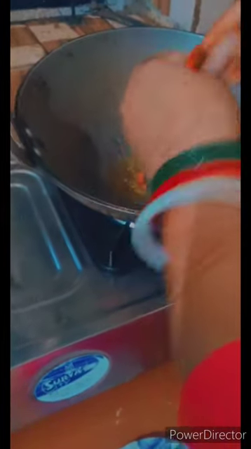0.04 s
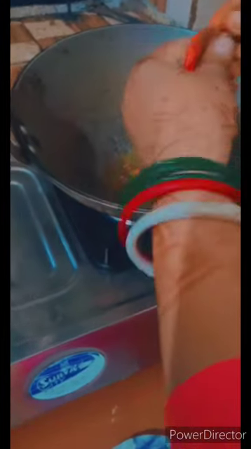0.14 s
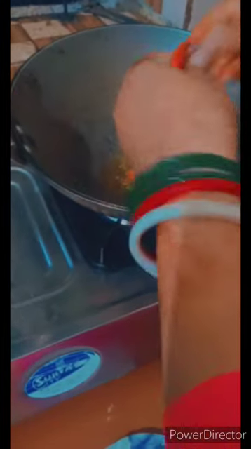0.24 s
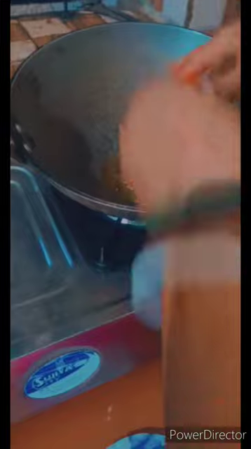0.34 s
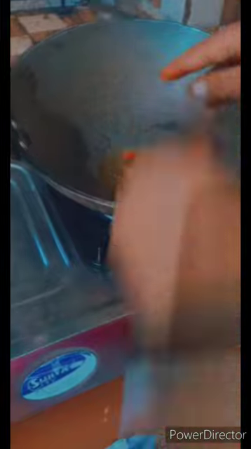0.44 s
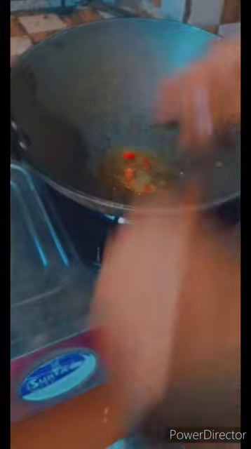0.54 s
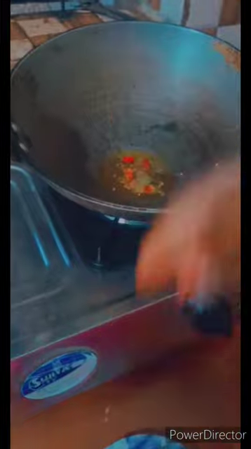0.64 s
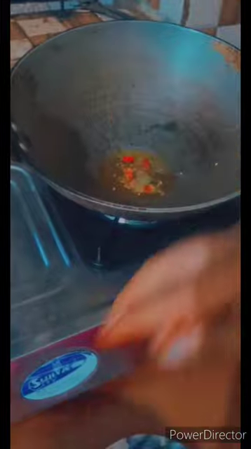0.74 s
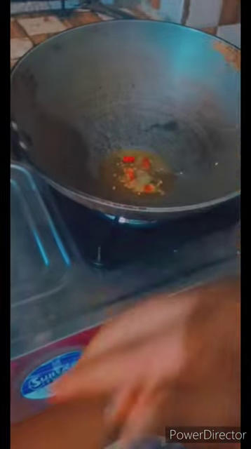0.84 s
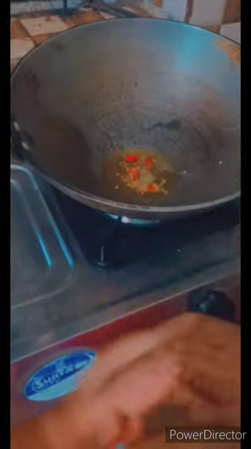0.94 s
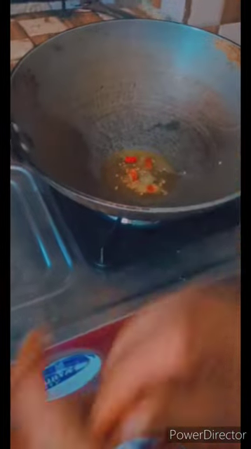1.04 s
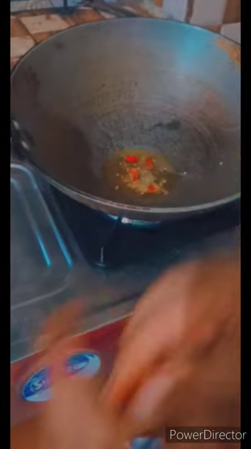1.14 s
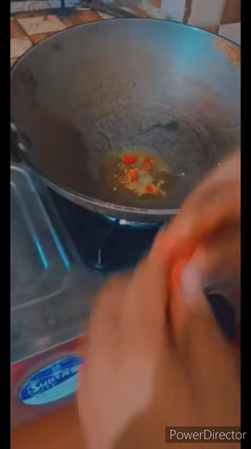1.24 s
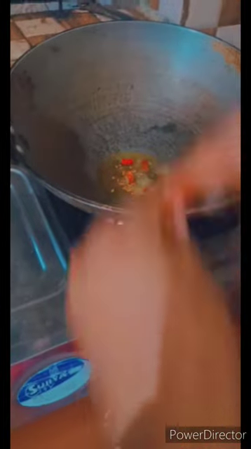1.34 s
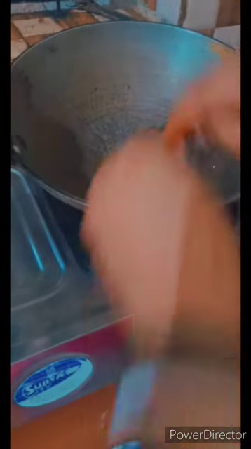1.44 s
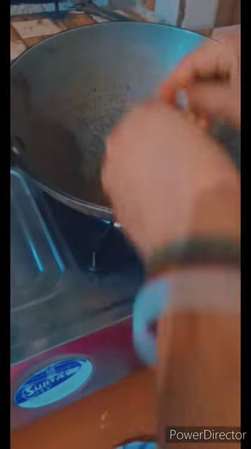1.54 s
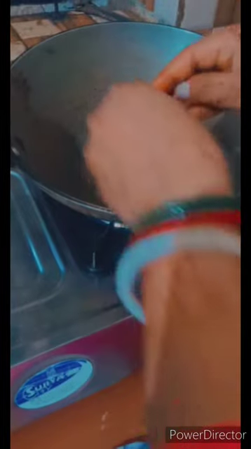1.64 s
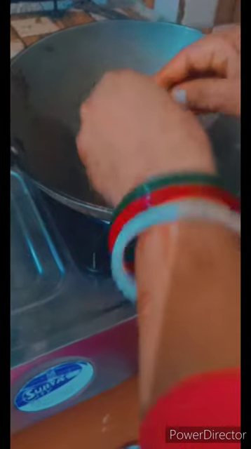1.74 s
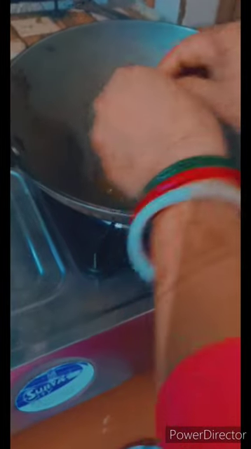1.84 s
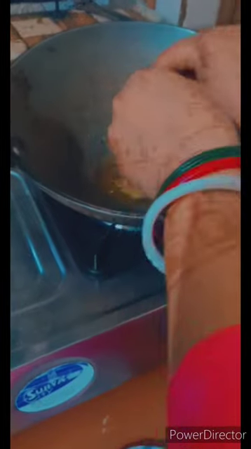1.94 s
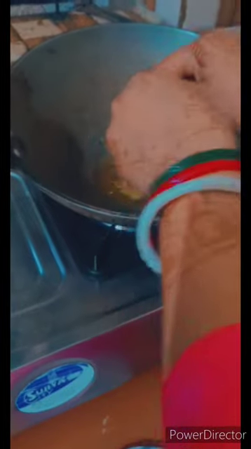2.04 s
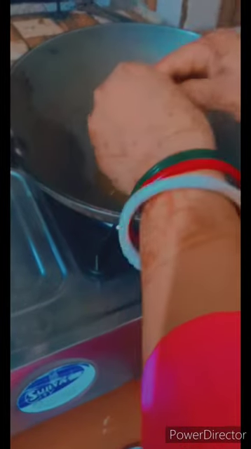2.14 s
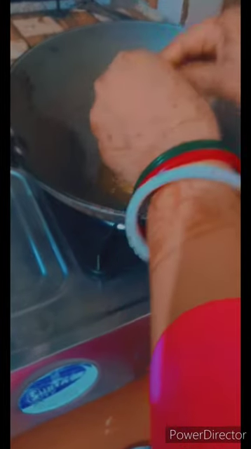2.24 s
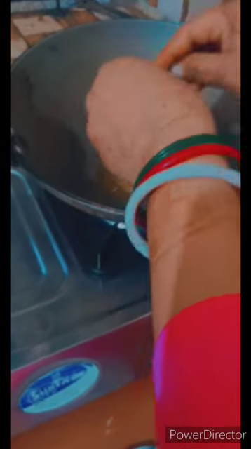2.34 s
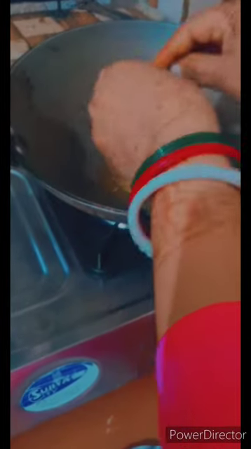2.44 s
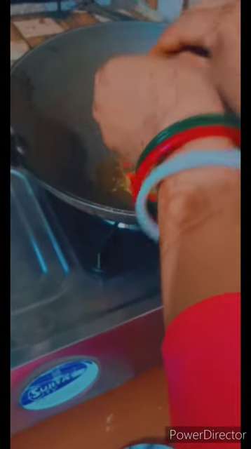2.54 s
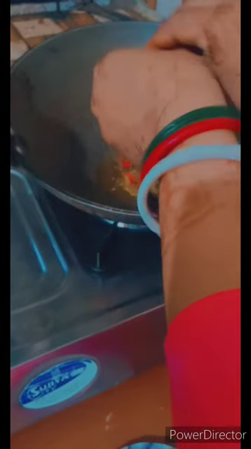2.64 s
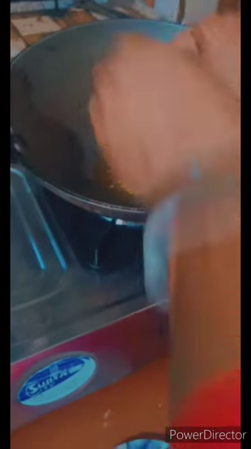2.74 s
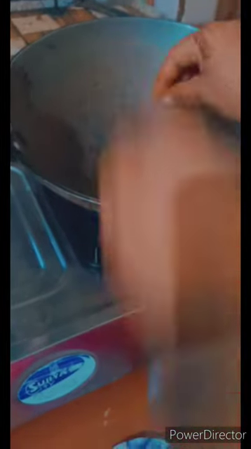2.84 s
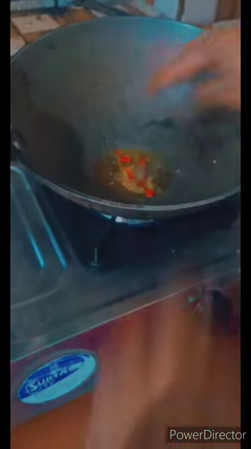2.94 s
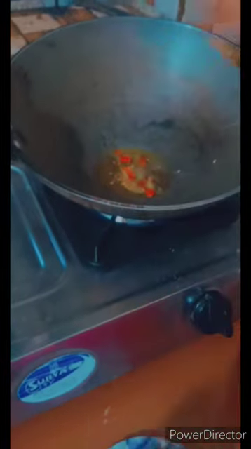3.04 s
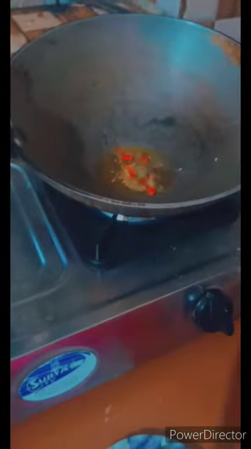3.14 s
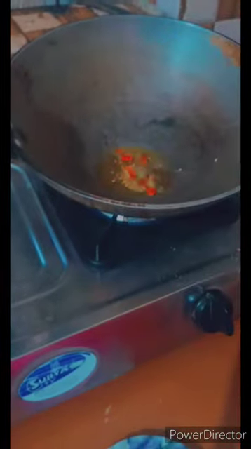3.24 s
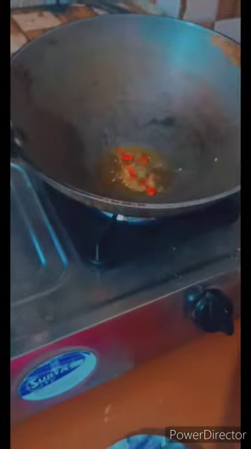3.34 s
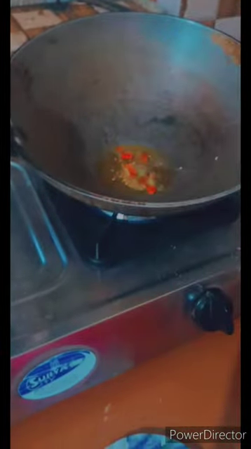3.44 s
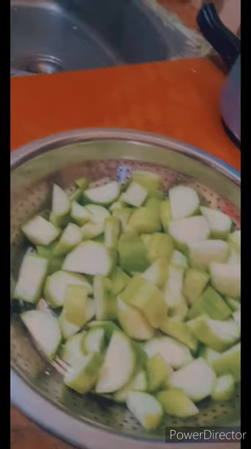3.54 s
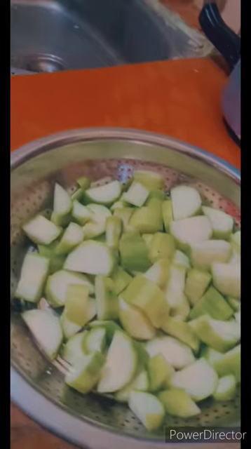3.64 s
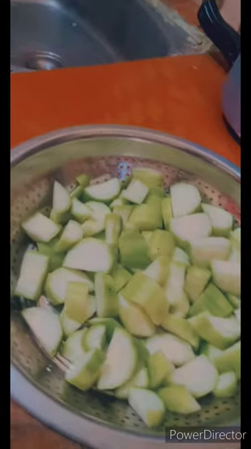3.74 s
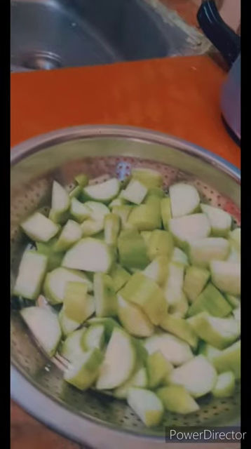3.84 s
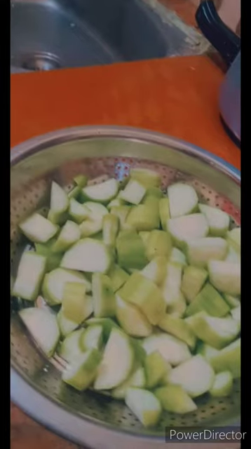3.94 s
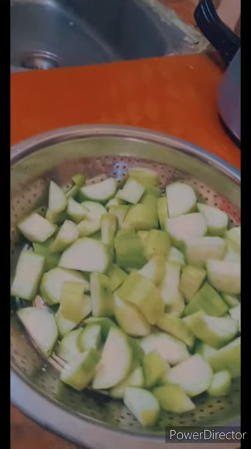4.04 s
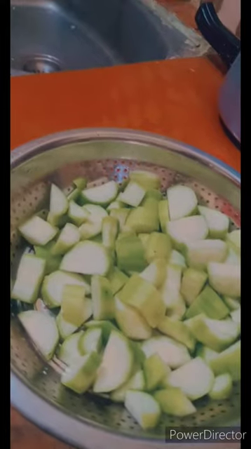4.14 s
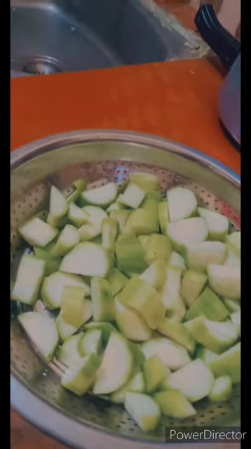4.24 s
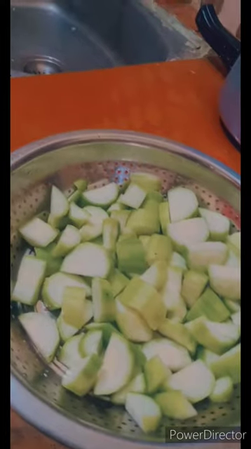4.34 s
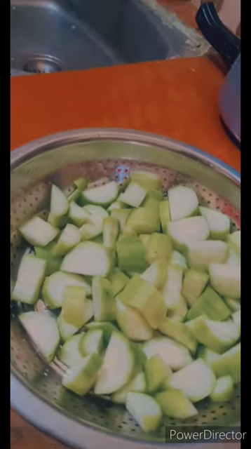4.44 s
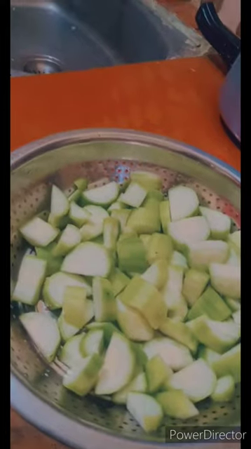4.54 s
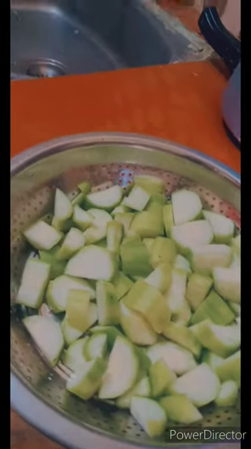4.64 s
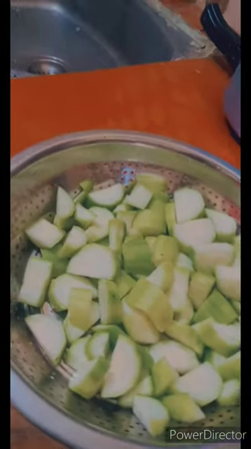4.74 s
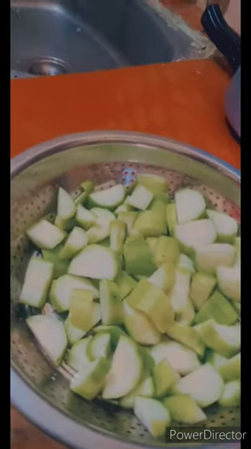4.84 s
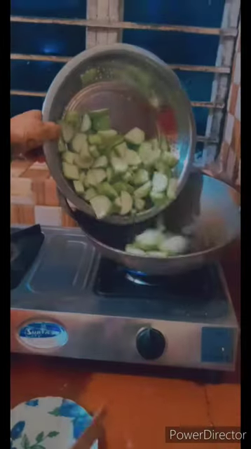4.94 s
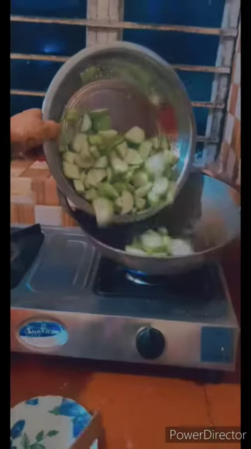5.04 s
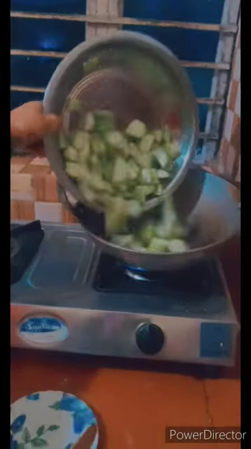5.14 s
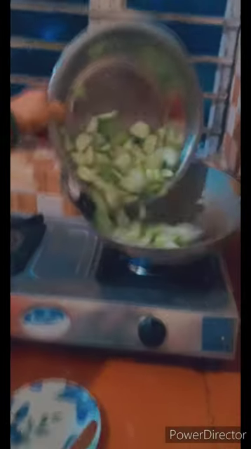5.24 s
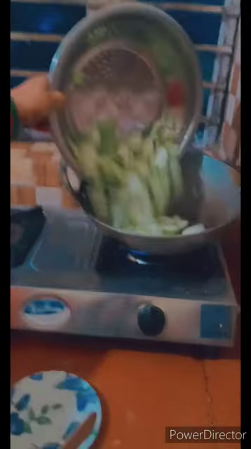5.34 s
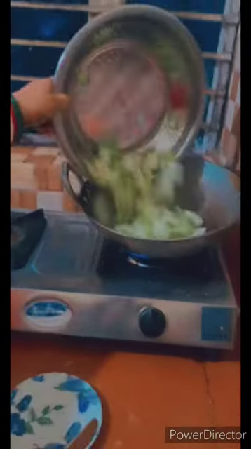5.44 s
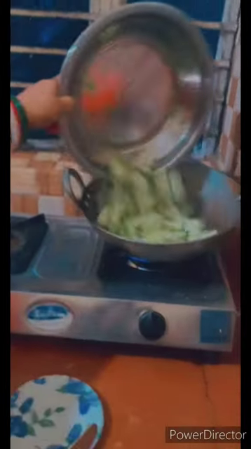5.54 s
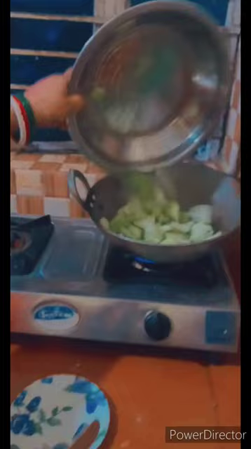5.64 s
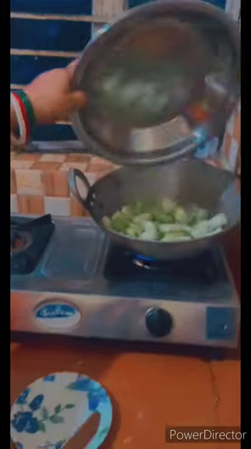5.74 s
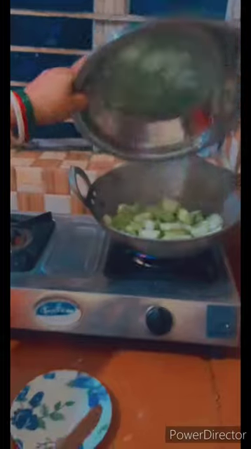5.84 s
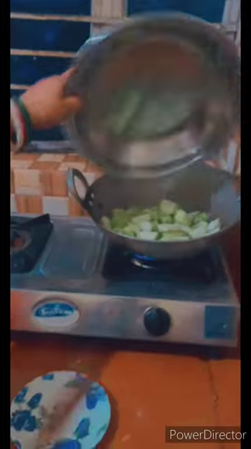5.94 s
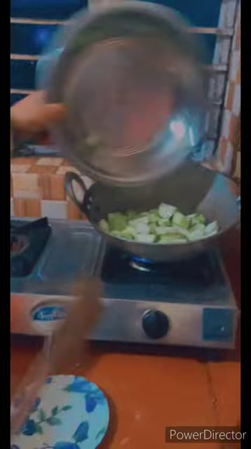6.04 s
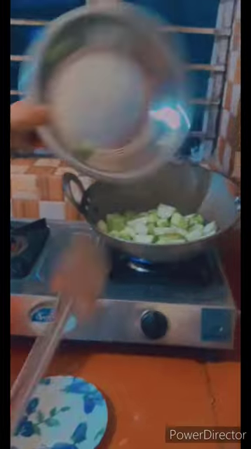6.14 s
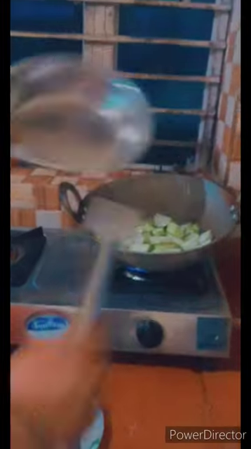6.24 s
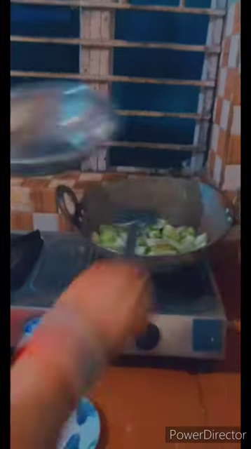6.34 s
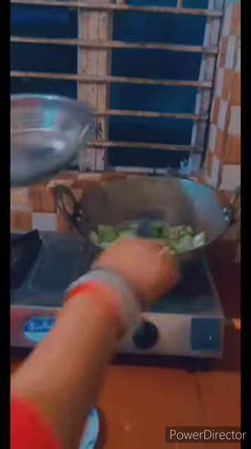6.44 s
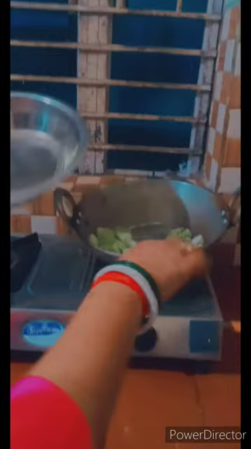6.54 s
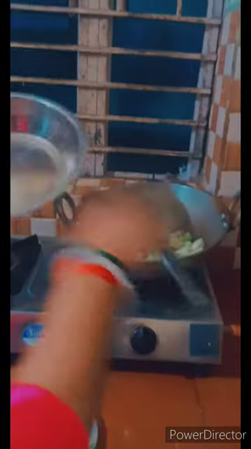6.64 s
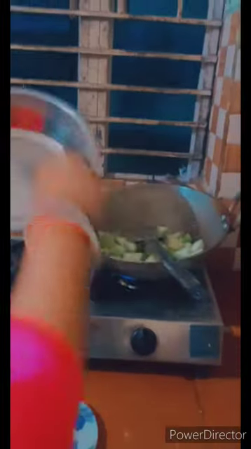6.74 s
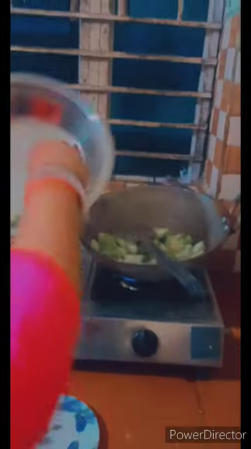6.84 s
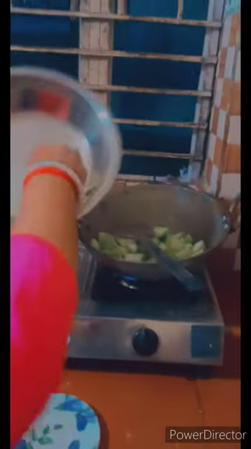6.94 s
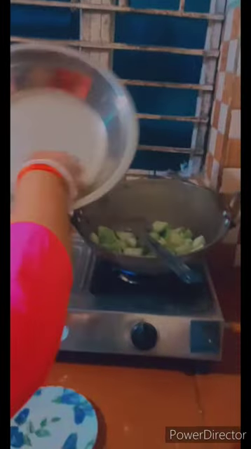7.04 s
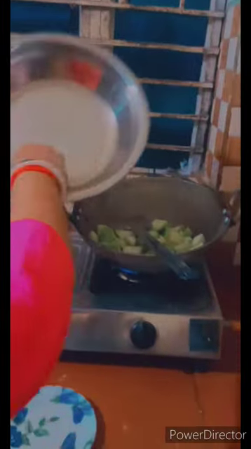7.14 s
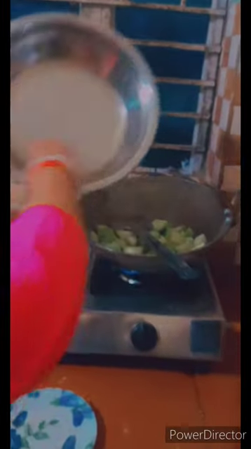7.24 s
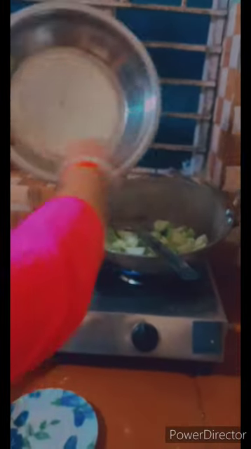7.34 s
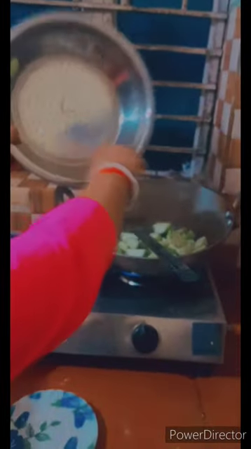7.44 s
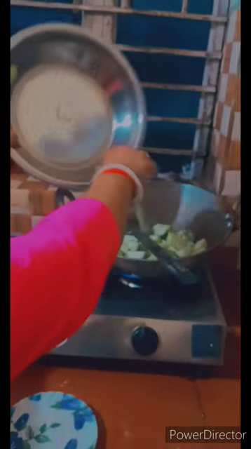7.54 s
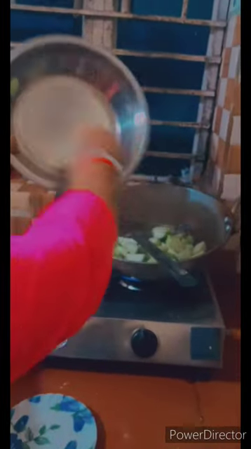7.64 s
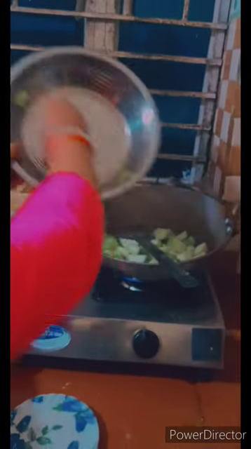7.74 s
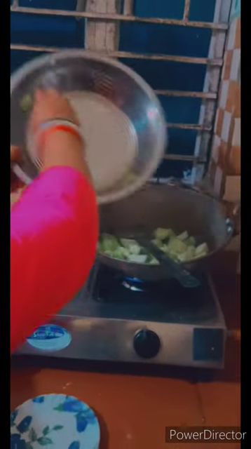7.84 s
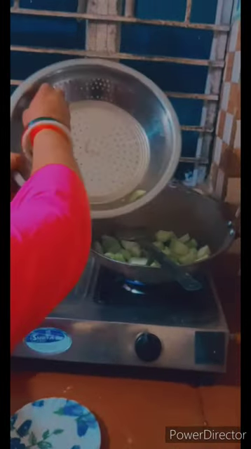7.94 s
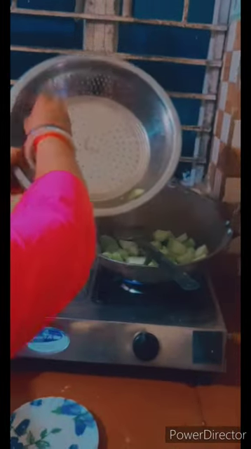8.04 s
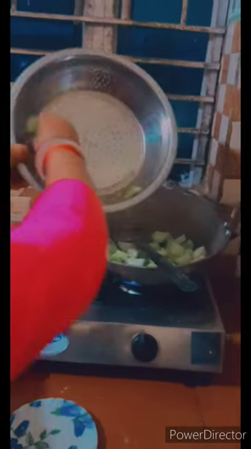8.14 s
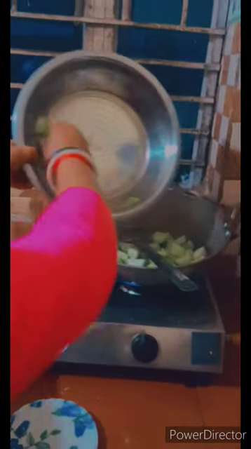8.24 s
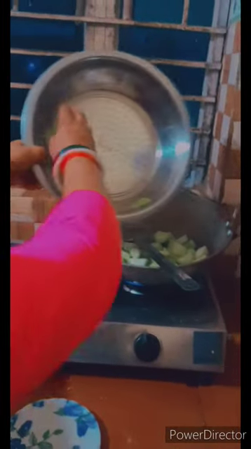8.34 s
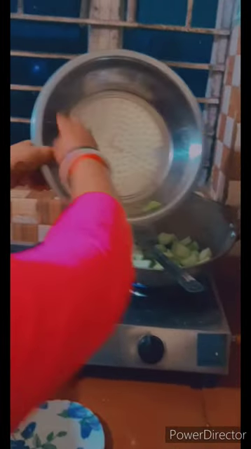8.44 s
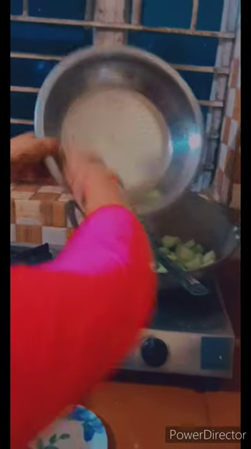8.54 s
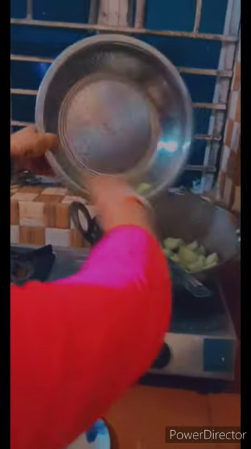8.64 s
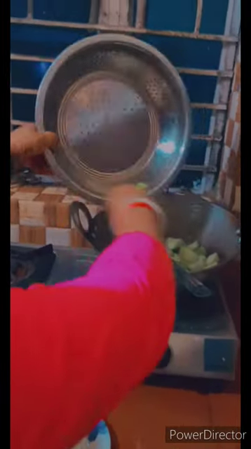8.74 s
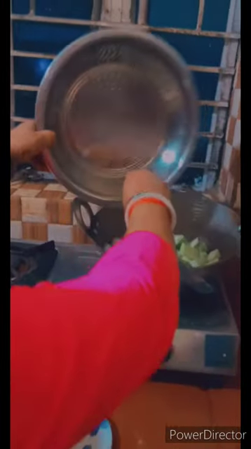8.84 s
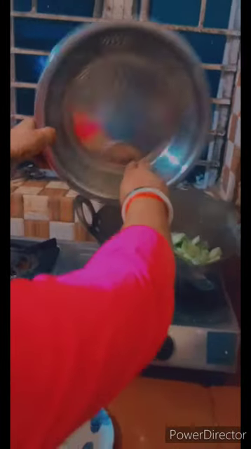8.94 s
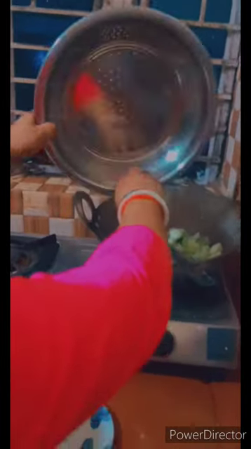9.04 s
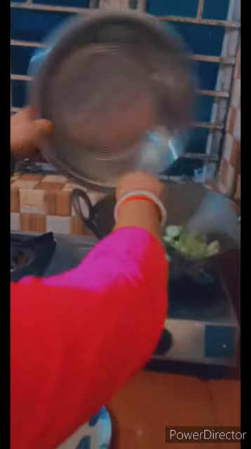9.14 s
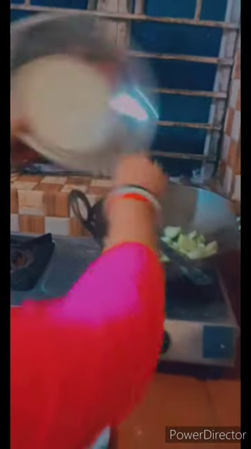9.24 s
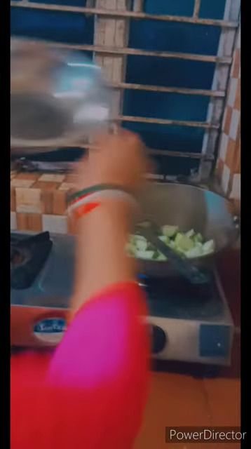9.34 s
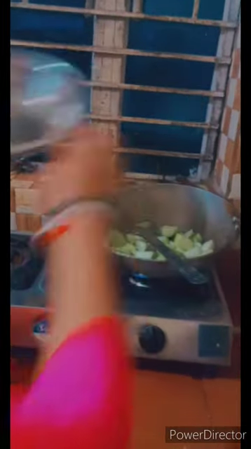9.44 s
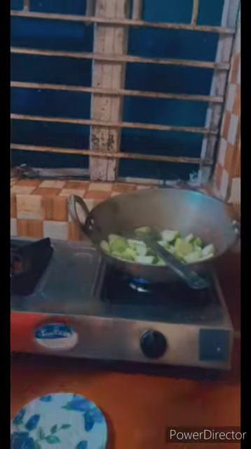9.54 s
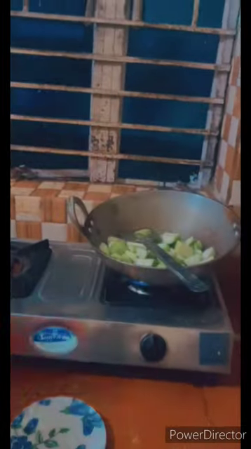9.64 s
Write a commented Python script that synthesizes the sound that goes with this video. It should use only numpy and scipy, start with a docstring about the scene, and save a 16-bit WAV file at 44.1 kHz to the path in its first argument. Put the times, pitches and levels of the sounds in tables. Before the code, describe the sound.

Soft hum and small metallic clicks, brief silences, then a sudden loud roar of frying in a wok, with a metal spoon dropping in and scraping.

```python
"""A tiled home kitchen at one close microphone, in three shots with silence between them.
A fan hums as beating tones; a gas flame hisses steadily over rumbling air, both finely patchy noise.
Bangles click and utensils tap, as short cracks followed by dying noise, and a gas knob snaps over.
Chopped gourd tumbles into a steel wok and fries loudly: dense noise bursts coloured by the bowl.
A metal spoon drops into the wok, bounces and scrapes: ringing modes with short rasps."""
import sys
import numpy as np
from scipy import signal
from scipy.fft import rfft, irfft
from scipy.io import wavfile
from scipy.ndimage import uniform_filter1d

SR = 44100
rng = np.random.default_rng(int(sys.argv[2]) if len(sys.argv) > 2 else 0)


def materialize(psi):
    """Save the field psi as 16-bit PCM at rate SR to the path in sys.argv[1].

    A 1-D psi becomes a single channel; in a 2-D psi each row is a channel.
    """
    bounded = np.clip(np.atleast_2d(psi).T, -1, 1)
    quanta = np.round(bounded * 32767).astype(np.int16)
    wavfile.write(sys.argv[1], SR, quanta)


N = 427329
TIME = np.arange(N) / SR
FREQS = np.fft.rfftfreq(N, 1 / SR)
SHEEN_HZ = 14200  # above this the very top of the frying and the clicks stands out
HEAP_S = 5.076  # the heap of gourd slides into the oil

# Spectrum of the sizzle. Each row: frequency in Hz, relative level in dB.
SIZZLE = [(60, -41), (230, -15.5), (350, -25), (500, -14), (800, -5.5), (1400, -2), (2200, 2.5), (3000, 0),
          (4500, 2.5), (5700, 0.5), (6600, -5), (7300, -18.5), (8100, -27), (11000, -21.5), (13900, -21)]
# The bowl of the wok colours the frying. Each row: frequency in Hz, width in Hz, gain in dB.
WOK_RESONANCES = [(525, 28, 4), (593, 18, -12), (786, 9.8, 4.5), (966, 175, -4), (1090, 18, 6.5),
                  (1380, 28, 0), (1408, 46, 5), (1720, 42, 3), (2262, 65, 4), (3380, 60, 0.5)]
BUBBLES_PER_S, BUBBLE_SPREAD_DB = 15000, 1.5
SHEEN_WIDTH_HZ, SHEEN_DB = 100, 11
# a few pieces reach the oil ahead of the heap
FIRST_PIECES_S, FIRST_PIECES_DB, FIRST_RISE_S = 4.995, -12.5, 0.036
HEAP_RISE_S = 0.013
FRY_DB, FRY_SWAY_DB = -23.5, .3  # steady sizzle and its slow unrest
FLASH_DB, FLASH_PEAK_S, FLASH_WIDTH_S = 1.55, 5.45, 0.25  # surface water flashes to steam
# bubbling deepens as juice seeps out; levels are relative to the sizzle
BODY_WET_DB, BODY_SETTLED_DB, BODY_SWAY_DB = -14.5, -9.5, 0.57
JUICE_S, JUICE_SPREAD_S = 6.25, 0.41
# fine spray thins as the oil cools; levels are relative to the sizzle
SPRAY_FRESH_DB, SPRAY_SETTLED_DB, SPRAY_SWAY_DB, SPRAY_FADE_S = -10, -13, 0.8, 2.15


def frying():
    """Thousands of steam bubbles burst each second; the bowl of the wok colours them."""
    flash_db = FLASH_DB * np.exp(-((TIME - FLASH_PEAK_S) / FLASH_WIDTH_S) ** 2)
    level_db = FRY_DB + flash_db + FRY_SWAY_DB * sway(per_s=5.5)
    juice = (1 + np.tanh((TIME - JUICE_S) / JUICE_SPREAD_S)) / 2
    fresh = np.exp(-np.maximum(TIME - HEAP_S, 0) / SPRAY_FADE_S)
    body_db = BODY_WET_DB + (BODY_SETTLED_DB - BODY_WET_DB) * juice
    body_db = body_db + BODY_SWAY_DB * sway(per_s=4.9)
    spray_db = SPRAY_SETTLED_DB + (SPRAY_FRESH_DB - SPRAY_SETTLED_DB) * fresh
    spray_db = spray_db + SPRAY_SWAY_DB * sway(per_s=3.5)

    bubbles = room(pops(BUBBLES_PER_S, BUBBLE_SPREAD_DB), wet_db=-3.5)
    bursts = rfft(bubbles + 0.97 * rng.standard_normal(N))
    sheen = (1 + np.tanh((FREQS - SHEEN_HZ) / SHEEN_WIDTH_HZ / 2)) / 2
    colour = amp(read(SIZZLE, FREQS) + SHEEN_DB * sheen)
    for hz, width, db in WOK_RESONANCES:
        colour = colour * amp(db / (1 + (2 * (FREQS - hz) / width) ** 2))

    low, high = 1 - above(FREQS, 2390), above(FREQS, 7100, order=24)
    body = band(bursts, colour * low, 500, 1800)
    hiss = band(bursts, colour * (1 - low - high), 2000, 7000)
    spray = band(bursts, colour * high, 9000, 15500)
    first_pieces = amp(FIRST_PIECES_DB) * rise(FIRST_PIECES_S, FIRST_RISE_S)
    in_oil = np.maximum(first_pieces, rise(HEAP_S, HEAP_RISE_S))
    return in_oil * amp(level_db) * (hiss + amp(body_db) * body + amp(spray_db) * spray)


# Ringing of the steel wok. Each row: frequency in Hz, relative level in dB, undamped t60 in seconds.
WOK_MODES = [(470, -19, .4), (525, -15, .4), (784, -22, .4), (1114, -12, .55), (1400, -18, .4),
             (1448, -7, .35), (1626, -7, .45), (1911, -4, .38), (2229, 1, .45), (3187, -12, .1),
             (3704, 4, .18), (4630, -11, .26), (5114, 1, .45), (5722, -13, .35), (6293, -9, .25),
             (6600, -10, .2), (6783, -10, .2)]
# pieces thud on the steel while the bowl empties
POUR_DB, POUR_HOLD_S, POUR_FADE_DB_PER_S = -39, 0.29, 32
POUR_DAMPING = .22  # the sliding heap cuts the wok's ring to this share of its length


def pouring():
    """Soft wet pieces thud on the steel and wake only its low modes."""
    level_db = POUR_DB - POUR_FADE_DB_PER_S * np.maximum(TIME - HEAP_S - POUR_HOLD_S, 0)
    thud = tinted(2048, lambda f: hump(f, 790, octaves=1.24)) * np.exp(-TIME[:2048] / 0.0085)
    blows = signal.oaconvolve(pops(per_s=700, spread_db=1.5), thud)[:N]
    damped_modes = [(hz, db, t60 * POUR_DAMPING) for hz, db, t60 in WOK_MODES[:5]]
    rung = signal.oaconvolve(blows, ring(damped_modes))[:N]
    return amp(level_db) * rise(HEAP_S, HEAP_RISE_S) * (unit(blows) + 0.85 * unit(rung))


# The spoon landing, bouncing and sliding. Each row: start in seconds, then the relative levels
# in dB of the wok's ring, the spoon's ring and the contact noise.
SPOON_BLOWS = [(6.5393, -19.5, -13.5, -24), (6.55, -31, -31, -29), (6.569, -39, -32, -32),
               (6.63, -31, -13, -30), (6.633, -40, -23, -34), (6.659, -39, -22, -34),
               (6.675, -34, -26, -21), (6.688, -43, -20, -36)]
# Ringing of the spoon. Each row: frequency in Hz, relative level in dB, t60 in seconds.
SPOON_MODES = [(2536, -6, .3), (3876, -14, .25), (5270, -5, .03), (5416, -4, .27), (5480, 0, .025),
               (6132, -13, .25), (6928, -10, .2)]


def spoon():
    """Each blow rings wok and spoon, with a short rasp as the metal slides."""
    out, t = np.zeros(N), TIME[:4096]
    times, wok_db, spoon_db, rasp_db = np.transpose(SPOON_BLOWS)
    add(out, times[0], battered(WOK_MODES, times, wok_db) + battered(SPOON_MODES, times, spoon_db))
    for s, db in zip(times, rasp_db):
        rasp = tinted(len(t), lambda f: amp(read(SIZZLE, f))) * np.exp(-t / 0.0085)
        add(out, s, amp(db) * rasp)
    return room(out * amp(-1), wet_db=-10)


def battered(modes, times, levels_db):
    """A body struck again and again: each blow adds energy to every mode."""
    t = TIME[:SR]
    since = t - (times - times[0])[:, None]
    blows = amp(levels_db)[:, None] * np.clip(since / 0.0012, 0, 1)  # the food cushions the contact
    out = np.zeros(len(t))
    for hz, db, t60 in modes:
        decay_db = db - 60 * np.maximum(since, 0) / t60
        energy = np.sum((blows * amp(decay_db)) ** 2, axis=0)
        out += np.sqrt(energy) * np.sin(2 * np.pi * (hz * t + rng.random()))
    return out


# Bangles clicking on the wrist. Each row: start in seconds, relative level in dB, centre in Hz,
# relative top treble in dB.
BANGLES = [(.0786, -18.5, 7000, 1.5), (.2872, -33, 7760, -12), (.3134, -38, 8220, -10),
           (.4062, -21, 5040, -6), (0.422, -32, 8450, -7), (.495, -29, 4080, 3), (1.118, -24.5, 7550, -9),
           (1.693, -30, 6960, -3), (1.729, -23, 5960, -21), (1.745, -11, 5570, -14),
           (1.7776, -10.5, 6300, -11), (2.0517, -27, 6700, 11), (2.2887, -34, 6410, 6),
           (2.4065, -21.5, 4420, 6), (2.9547, -15, 8360, -8), (2.965, -22, 4400, 1), (3.2316, -23, 8470, 0),
           (3.76, -24.5, 6000, -12)]
# A bangle left free to ring. Each row: start in seconds, relative level in dB.
CHIMES = [(.287, -39), (.314, -44), (.422, -40)]
# Its ringing. Each row: frequency in Hz, relative level in dB, t60 in seconds.
BANGLE_MODES = [(4170, -7, 0.061), (7321, -6, .05), (7650, -1, 0.044), (8400, 1.5, .04), (11680, -9, .05),
                (12300, 2, 0.051), (13120, -3, .06), (14500, 6, .05)]
# The gas knob snapping over. Each row: start in seconds, relative level in dB, centre in Hz,
# width in octaves, relative top treble in dB, t60 in seconds.
KNOB = [(1.3175, -17.5, 6230, .6, -22, .014), (1.318, -26.5, 2620, 2.3, -30, 0.011),
        (1.3298, -17.5, 6550, 0.65, -19, .016), (1.33, -21.5, 3620, 0.56, -30, 0.028)]
# Utensils tapping and clinking. Each row: start in seconds, relative level in dB, centre in Hz,
# width in octaves, t60 in seconds.
TAPS = [(0.334, -36.5, 5000, .62, 0.058), (.7796, -38, 6300, 0.13, 0.058), (.7921, -30, 6100, 0.28, .039),
        (1.5584, -21.5, 3800, 0.41, 0.0053), (2.0768, -36, 3330, 0.36, .029),
        (2.3208, -38.5, 5800, 0.41, 0.08), (2.514, -42, 5530, .21, 0.037), (2.7661, -38, 3800, 0.45, .042),
        (3.652, -40, 3680, 0.6, .03), (3.7858, -30, 3870, 0.89, .038), (3.905, -46, 4730, 0.89, .035),
        (4.2667, -45.5, 6500, .77, .038), (4.363, -24.5, 4020, 0.25, 0.063), (4.4844, -44, 7250, .22, .035),
        (4.752, -34, 5200, 0.36, 0.046), (4.8543, -37, 3570, 0.46, .039), (2.9665, -34, 4250, 0.065, 0.033)]
# Sleeve and hand brushing past. Each row: start in seconds, length in seconds,
# relative level in dB, centre in Hz.
BRUSHES = [(-.06, 0.094, -46, 6100), (0.435, 0.21, -60, 3540), (1.379, 0.34, -63.5, 4960),
           (2.74, 0.21, -56.5, 3500)]
BANGLE_OCTAVES, BANGLE_T60_S = 0.87, 0.019  # one ring length for all bangle clicks
BANGLE_HARD_DB, BANGLE_HARD_OCTAVES = -15, .42  # a hard click brings out the main resonance
TAP_TOP_DB = -28  # relative top treble of every tap
CRACK_DB, CRACK_OCTAVES, CRACK_T60_S = -11, 2.2, .011  # each tap opens with a brief broad crack


def handling():
    """Bangles, gas knob, utensils and a sleeve, heard with the room."""
    bangles = []
    for s, db, hz, top_db in BANGLES:
        octaves = BANGLE_HARD_OCTAVES if db > BANGLE_HARD_DB else BANGLE_OCTAVES
        bangles.append((s, db, hz, octaves, top_db, BANGLE_T60_S))
    wrist = clicks(bangles, crest_db=-5.5, treble_db=-5.5, contact_s=0.00056, body_db=-9)
    for s, db in CHIMES:
        add(wrist, s, amp(db) * ring(BANGLE_MODES))

    stove = clicks(KNOB, crest_db=-6, treble_db=-9, contact_s=0.0026, body_db=-16)

    taps = [(s, db, hz, octaves, TAP_TOP_DB, t60) for s, db, hz, octaves, t60 in TAPS]
    taps += [(s, db + CRACK_DB, hz, CRACK_OCTAVES, TAP_TOP_DB, CRACK_T60_S) for s, db, hz, _, _ in TAPS]
    things = clicks(taps, crest_db=-2.0, treble_db=-13.5, contact_s=0.0016, body_db=0)
    for s, length, db, hz in BRUSHES:
        rub = tinted(SR // 2, lambda f: hump(f, hz, octaves=1.7))[:round(length * SR)]
        add(things, s, amp(db) * rub * np.hanning(len(rub)))
    return room(wrist, wet_db=-4.5) + room(stove, wet_db=-2.5) + room(things, wet_db=-1.0)


def clicks(rows, crest_db, treble_db, contact_s, body_db):
    """Hard contacts: a short crack, then dying noise for the crowded modes of a small object."""
    out, t = np.zeros(N), TIME[:4096]
    f = np.fft.rfftfreq(len(t), 1 / SR)
    for s, db, hz, octaves, top_db, t60 in rows:
        sheen = 1 + 3 * above(f, SHEEN_HZ, order=40)
        top = amp(top_db + treble_db) * above(f, 5600, order=4) * sheen
        colour = hump(f, hz, octaves) + top
        crack = np.exp(-t / contact_s)
        body = amp(body_db - 60 * t / max(t60, .003))
        envelope = (crack + body) * (1 - np.exp(-t / 0.00041)) ** 2
        burst = rfft(rng.standard_normal(len(t)) * envelope / envelope.max())
        # a sharp contact drives all frequencies about equally
        power = abs(burst) ** 2
        burst *= np.sqrt(np.mean(power) / uniform_filter1d(power, size=60))
        lead = 256  # samples kept ahead of the contact, as the colouring spreads both ways
        click = np.roll(irfft(burst * unit(colour)), lead)
        add(out, s - lead / SR, amp(db + crest_db) * click)
    return out


# Spectrum of the kitchen background. Each row: frequency in Hz, relative level in dB.
KITCHEN = [(20, -18), (70, 0.5), (160, -2.5), (320, -4), (550, -9.5), (1100, -12.5), (1700, -17),
           (2500, -15.5), (3200, -12), (5700, -9.5), (6500, -1.5), (8300, -11), (13800, -18.5), (15100, -4)]
RUMBLE_DB, RUMBLE_SWAY_DB, FLAME_DB, FLAME_SWAY_DB = -67.5, 1.5, -62.5, -0.5
DRONE_HZ, DRONE_DB, DRONE_SWAY_DB = 481, -69, 3.2  # a wavering drone in the air of the first shot
OIL_TICKS_DB, AWAY_DB = -72.5, -8  # the oil is farther off in the second shot


def background():
    """Moving air rumbles and drones, the gas flame hisses and the hot oil ticks."""
    rumble_db = RUMBLE_DB + RUMBLE_SWAY_DB * sway(per_s=4.7)
    hiss_db = FLAME_DB + FLAME_SWAY_DB * sway(per_s=3.4)
    noise, high = rfft(rng.standard_normal(N)), above(FREQS, 1540, order=4)
    colour = amp(read(KITCHEN, FREQS))
    rumble = band(noise, colour * (1 - high), 230, 1500)
    hiss = band(noise, colour * high, 2500, 15000)
    air_and_flame = patchy(amp(rumble_db) * rumble + amp(hiss_db) * hiss)

    drone_level = amp(DRONE_DB + DRONE_SWAY_DB * sway(per_s=12)) * (TIME < SHOTS[0][1])
    drone = drone_level * tinted(N, lambda f: hump(f, DRONE_HZ, octaves=0.038))

    tick_train = rfft(pops(per_s=150, spread_db=7.5))
    ticks = unit(irfft(tick_train * hump(FREQS, 7000, octaves=1.3), N))
    away = (TIME > SHOTS[1][0]) * (TIME < SHOTS[1][1])
    return air_and_flame + drone + room(amp(OIL_TICKS_DB + AWAY_DB * away) * ticks, wet_db=2)


def patchy(x):
    """Lets narrow patches of the spectrum swell and fade by chance."""
    z = signal.stft(x, nperseg=1024, noverlap=768)[2]
    patches = uniform_filter1d(rng.standard_normal(z.shape), size=8, axis=0)
    patches = uniform_filter1d(patches, size=11, axis=1, mode="wrap")
    depth_db = 2.8
    return signal.istft(z * amp(depth_db * unit(patches)), nperseg=1024, noverlap=768)[1][:N]


# Throb of the hum, one row per shot. Each row: time of one swell in seconds, swells per second.
THROBS = [(.171, 3.9), (3.805, 3.83), (5.123, 3.84)]
# Tones of the hum, one row per shot. Each row: mean levels in dB of the mains, the fan's turn,
# its blades, their overtone and the whine.
HUM = [(-59, -80, -65.5, -64.5, -94), (-63, -77, -65.5, -63.5, -67.5), (-61, -77, -63, -59.5, -90)]
MAINS_HZ, WHINE_ORDER = 100, 9  # the whine is this multiple of the fan's turn


def hum(throb, levels):
    """The fan slips behind the mains, so their tones beat about four times a second."""
    swell_s, beat_hz = throb
    blade_hz = MAINS_HZ - beat_hz
    turn_hz = blade_hz / 2
    tones_hz = [MAINS_HZ, turn_hz, blade_hz, 2 * blade_hz, WHINE_ORDER * turn_hz]
    knots, out = np.linspace(0, 10, 70), np.zeros(N)  # seconds
    for hz, db in zip(tones_hz, levels):
        waver_db = 2.2 * np.interp(TIME, knots, rng.standard_normal(len(knots)))
        out += amp(db + waver_db) * np.sqrt(2) * np.cos(2 * np.pi * hz * (TIME - swell_s))
    return out


# Decay of the tiled kitchen. Each row: frequency in Hz, t60 in seconds.
ROOM = [(200, 0.79), (1500, 0.49), (4000, 0.28), (8000, 0.32), (15000, 0.24)]


def room(x, wet_db):
    """Tiled kitchen: dense taps of random sign, fading at a rate set for each frequency."""
    count = SR // 2
    taps = rng.choice([-1., 1.], count) * (rng.random(count) < .15) * (TIME[:count] > .004)
    hz, t, z = signal.stft(taps, SR, nperseg=256)
    tail = signal.istft(z * amp(-60 * t / read(ROOM, hz)[:, None]), SR, nperseg=256)[1]
    return x + amp(wet_db) * signal.oaconvolve(x, tail / np.linalg.norm(tail))[:N]


def pops(per_s, spread_db):
    """A random train of bursts, most small and a few large."""
    size = amp(spread_db * np.minimum(rng.exponential(1, N), 5))
    return unit(size * rng.standard_normal(N) * (rng.random(N) < per_s / SR))


def ring(modes):
    """One blow on a body: dying sines of random phase."""
    t, out = TIME[:SR * 2 // 3], 0
    for hz, db, t60 in modes:
        out = out + amp(db - 60 * t / t60) * np.sin(2 * np.pi * (hz * t + rng.random()))
    return out


def tinted(count, shape):
    """Noise of rms 1 with random phases and the spectrum shape(f)."""
    f = np.fft.rfftfreq(count, 1 / SR)
    return unit(irfft(shape(f) * np.exp(2j * np.pi * rng.random(len(f))), count))


def band(spectrum, shape, lo, hi):
    """Shaped sound whose rms between lo and hi in Hz is 1."""
    z = spectrum * shape
    inside = (FREQS > lo) & (FREQS < hi)
    return irfft(z, N) * N / np.sqrt(2 * np.sum(abs(z[inside]) ** 2))


def hump(f, centre_hz, octaves):
    """A broad resonance, steep below its centre and gentler above."""
    away = np.log2((f + 1) / centre_hz) / octaves
    return 1 / (1 + away ** 2) ** np.where(away < 0, 1.7, 1.3)


def above(f, edge_hz, order=8):
    """Smooth share of each frequency that lies above an edge."""
    return 1 - 1 / (1 + (f / edge_hz) ** order)


def read(points, hz):
    """Reads a spectrum on a log-frequency axis."""
    f, value = np.transpose(points)
    return np.interp(np.log(hz + 1), np.log(f + 1), value)


def sway(per_s):
    """Slow random drift of rms 1, up to about this many swings a second."""
    return unit(irfft(rfft(rng.standard_normal(N)) * (1 - above(FREQS, per_s, order=4)), N))


def rise(start_s, length_s):
    """Goes from 0 to 1, starting at a time."""
    return np.clip((TIME - start_s) / length_s, 0, 1)


def amp(db):
    """Decibels to gain."""
    return 10 ** (np.asarray(db) / 20)


def unit(x):
    """Scales to rms 1."""
    return x / np.sqrt(np.mean(x ** 2) + 1e-20)


def add(mix, s, sound):
    """Adds a sound at a time in seconds, trimmed to the ends of the mix."""
    at = round(s * SR)
    sound = sound[max(-at, 0):]
    part = mix[max(at, 0):][:len(sound)]
    part += sound[:len(part)]


# The three shots, with silence between them. Each row: start, end and fade-in, all in seconds.
SHOTS = [(0, 3.502, .002), (3.605, 4.903, .1), (4.997, 9.7, .015)]


def scene():
    """All sources at one close microphone, cut into shots and sent alike to both channels."""
    kitchen = handling() + frying() + pouring() + spoon() + background()
    out = np.zeros(N)
    for (start, end, fade), throb, levels in zip(SHOTS, THROBS, HUM):
        out += rise(start, fade) * (TIME < end) * (kitchen + hum(throb, levels))
    return np.array([out, out])


def record(dry):
    """A steep band limit at 15.6 kHz."""
    lowpass = signal.firwin(601, 15600, window=("kaiser", 8), fs=SR)
    return signal.oaconvolve(dry, lowpass[None], "same")


dry = scene()
out = record(dry)
materialize(out)
```